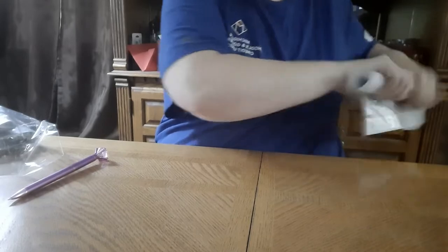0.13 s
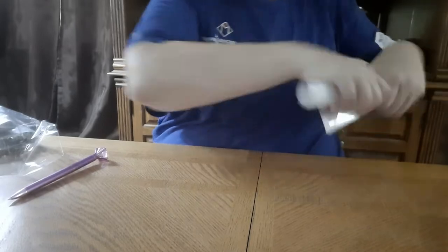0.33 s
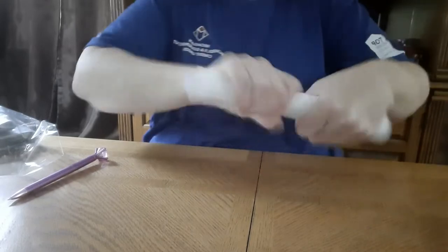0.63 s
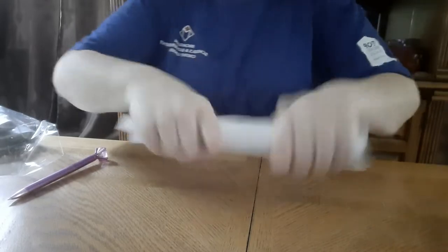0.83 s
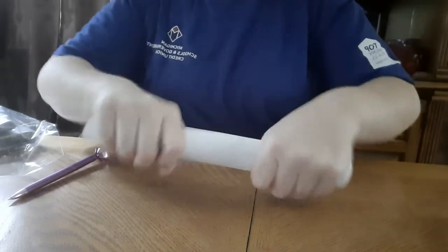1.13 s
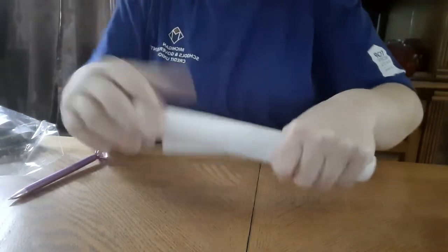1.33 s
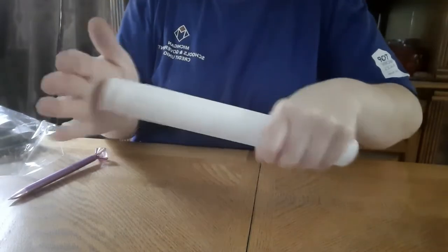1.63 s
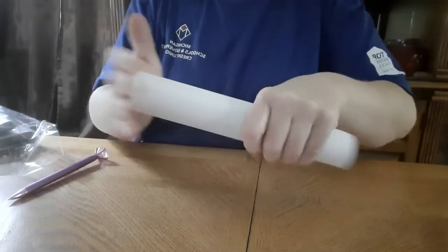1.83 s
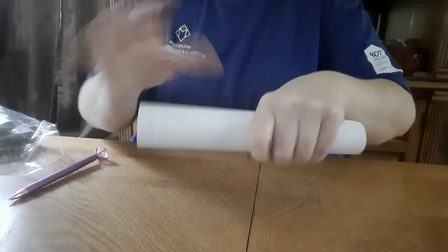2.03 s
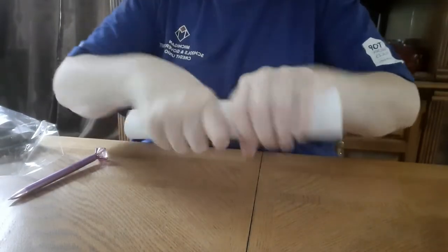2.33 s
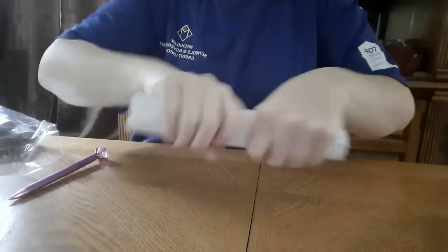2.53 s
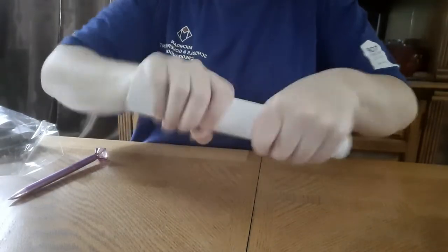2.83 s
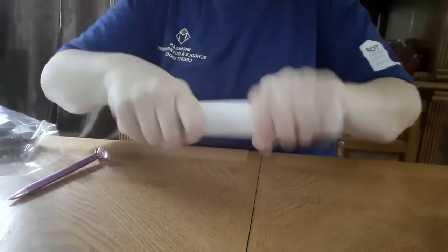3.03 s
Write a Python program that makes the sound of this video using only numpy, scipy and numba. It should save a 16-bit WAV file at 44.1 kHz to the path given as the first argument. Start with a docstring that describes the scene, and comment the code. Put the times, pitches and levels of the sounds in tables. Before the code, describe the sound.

Hands rub and tighten a stiff canvas roll over a wooden table, rasping several times a second, pausing briefly as a palm closes the end and lowers the hollow note, then rasping on; close, dry, small room.

```python
"""Two hands lift a stiff rolled canvas, which buckles, and twist it tighter over a wooden table in a small room.
Each twist slides the weave over itself: a bright noisy rasp that also sounds the air inside the roll.
Midway a palm pushes the end flush, closing the tube and lowering its note; then it opens and twisting goes on.
Small buckles, pats, finger ticks and bumps ring decaying tones or short noise bursts, over soft handling
noise and a quiet room."""
import sys
import numpy as np
from scipy import signal
from scipy.io import wavfile
from numba import njit

SR = 44100
rng = np.random.default_rng(int(sys.argv[2]) if len(sys.argv) > 2 else 0)


def digitize_waveform(pressure):
    """Quantize a signal to 16-bit integers and store it at the path in sys.argv[1].

    Rows of a 2-D input are taken as channels; values are limited to [-1, 1].
    """
    field = np.atleast_2d(pressure).T
    bounded = np.clip(field, -1, 1)
    quanta = np.round(bounded * 32767).astype(np.int16)
    wavfile.write(sys.argv[1], SR, quanta)


N = 141120  # length in samples

# Slides of the canvas over itself. Each row: peak in seconds, rise in seconds, fall in seconds, level in dB,
# air column in dB against that level, treble tilt in dB per octave, coarse scrape in dB against that level.
SLIDES = [ (.095, 0.058, 0.085, -41.5, 1, 1, -3), (.195, 0.025, 0.054, -44.5, -17, 3, 2.5),
          (.263, 0.044, 0.02, -36.5, 6.5, 4.2, -2), (.347, 0.042, 0.08, -34.5, -18, 1.4, -10.5),
          (0.496, 0.065, 0.072, -37.5, -3.5, -0.1, -7), (0.636, 0.053, 0.053, -33.5, -4.5, -0.1, -11.5),
          (.775, 0.075, 0.056, -34, -2, 0.8, -8.5), (.907, 0.062, 0.045, -32.5, -3.5, 0.5, -44),
          (1.013, 0.045, 0.064, -32.5, -1, 1.4, -5), (1.147, 0.061, 0.046, -35.5, 1, 1.5, -7.5),
          (1.295, 0.06, .04, -39, -1.5, 0.5, -19), (1.563, 0.024, .04, -37, 3.5, -1.5, -9),
          (1.67, 0.062, 0.11, -48.5, 5, -1.3, -8), (1.754, 0.051, .033, -33.5, 5.5, -1.4, -9),
          (1.804, 0.034, 0.014, -53, 15.5, 3, -16), (1.9, 0.03, 0.025, -36.5, -10.5, -0.95, -28),
          (2.001, 0.02, 0.021, -47.5, 3.5, -1.5, -22), (2.218, 0.0068, 0.034, -43, 2, 2, -21),
          (2.361, 0.079, 0.095, -33.5, 3, -0.5, -24), (2.544, 0.052, 0.057, -34, 3, 1, -22),
          (2.704, 0.065, 0.059, -33, -1, -0.15, -14.5), (2.832, 0.05, 0.06, -33.5, 4, 3, -11),
          (2.982, 0.061, .05, -31, 6.5, 0.1, -14), (3.115, 0.059, 0.037, -32.5, 3.5, 2.8, -23),
          (3.195, 0.023, .03, -48.5, 5.5, -1, -14)]


def from_db(db):
    """Turn decibels into a gain."""
    return 10 ** (np.asarray(db) / 20)


def rms_one(x):
    """Scale to an average power of one."""
    return x / np.sqrt(np.mean(x ** 2) + 1e-20)


def in_time(rows):
    """Draw straight lines between (seconds, value) rows, giving a value at every sample."""
    return np.interp(np.arange(N) / SR, *np.transpose(rows))


def at_hz(points, hz):
    """Read a (Hz, value) curve at one frequency, on a logarithmic frequency axis."""
    curve_hz, values = np.transpose(points)
    return np.interp(np.log(hz), np.log(curve_hz), values)


def cut(x, hz, kind):
    """Keep the low, high or middle part of a sound with a second-order Butterworth design."""
    sos = signal.butter(2, np.clip(hz, 10, .45 * SR), kind, fs=SR, output="sos")
    return signal.sosfilt(sos, x + 1e-18)


def pan(db):
    """Left and right gains, the left louder by db, with a mean power of one."""
    return rms_one(from_db(np.array([[db], [-db]]) / 2))


def drift(rate_hz):
    """Smooth random motion of spread 1, made by low-passing noise; a higher rate wanders faster."""
    step = 40  # samples between the slow values
    r = np.exp(-2 * step * np.pi * rate_hz / SR)
    noise = rng.standard_normal(N // step + 2002)
    slow = signal.lfilter([1], [1, -2 * r, r * r], noise)[2000:]  # skip the filter's start
    return np.interp(np.arange(N) / step, np.arange(len(slow)), rms_one(slow))


def clicks(rows):
    """Place one impulse for each (seconds, dB) row."""
    s, db = np.transpose(rows)
    places = np.clip(s * SR, 0, N - 1).astype(int)
    return np.bincount(places, from_db(db), N)


def strike(rows, modes, vary_db):
    """Each blow rings every mode as a dying sine, with a random strength of its own."""
    out = 0
    for k, (hz, db, t60) in enumerate(modes):
        r = from_db(-60 / (t60 * SR))  # loss per sample
        angle = 2 * np.pi * hz / SR
        blows = [(s, level + db + vary_db * rng.standard_normal()) for s, level in rows]
        force = clicks(blows) + 1e-18
        ring = signal.lfilter([0, np.sin(angle)], [1, -2 * r * np.cos(angle), r * r], force)
        out = out + (-1) ** k * ring  # every other mode is turned upside down
    return out


def crack(rows, decay_s):
    """Sudden releases give tiny, fading bursts of bright stereo noise."""
    fade = signal.lfilter([1], [1, -np.exp(-1 / (decay_s * SR))], clicks(rows) + 1e-18)
    return fade * cut(rng.standard_normal((2, N)), 2530, "high")


def friction():
    """Threads catch on one another at random, over smooth sliding noise; power is about one."""
    snags_per_s, spread_db, share = 1800, 2.5, 0.41  # share: part of the power that is snags
    sizes = from_db(spread_db * np.minimum(rng.exponential(1, N), 4)) * rng.choice([-1, 1], N)
    snags = rms_one(sizes * (rng.random(N) < snags_per_s / SR))
    return np.sqrt(share) * snags + np.sqrt(1 - share) * rng.standard_normal(N)


def bands(sources, spectrum):
    """Split noise into coloured stereo bands, giving (Hz, band) one at a time."""
    # Each row: frequency in Hz, left-right likeness (1 the same, -1 opposite).
    likeness = [(60, 0.45), (200, 0.63), (600, 1), (1200, -0.035), (2000, 0.44), (3300, -0.2),
                (5500, -0.14), (9000, 0.93), (12500, 0.94)]
    # Each row: frequency in Hz, left minus right in dB.
    balance = [(60, -0.5), (130, 10), (260, -0.5), (420, 4.5), (700, 0.5), (1290, 2), (2380, 5), (4400, -1),
               (6000, -0.5), (8000, -3), (10500, 6.5), (13000, 12.5), (15500, -3.5)]
    edges = np.geomspace(30, 17000, 25)
    for k, (low, high) in enumerate(zip(edges, edges[1:])):
        hz = np.sqrt(low * high)
        mid, side = cut(sources[k % 2], [low, high], "band")  # neighbours use different noise
        alike = np.clip(at_hz(likeness, hz), -1, 1)
        stereo = np.sqrt(1 + alike) * mid + np.sqrt(1 - alike) * side * [[1], [-1]]
        yield hz, from_db(at_hz(spectrum, hz)) * pan(at_hz(balance, hz)) * stereo


@njit
def resonate(x, angle, r):
    """A resonance whose pitch and damping may change at every sample."""
    out, state = np.zeros(len(x)), 0j
    for i in range(len(x)):
        state = state * r[i] * np.exp(1j * angle[i]) + x[i]
        out[i] = 2 * state.real
    return out


def stroke_powers():
    """The power of each slide over time: it swells and dies with the hand's speed."""
    drop_db = 11.5  # drop one rise or fall time away from the peak
    rise_shape, fall_shape = 2.8, 2.7  # powers that bend the two slopes
    t, rows = np.arange(N) / SR, []
    for s, rise, fall, db, *_ in SLIDES:
        away = np.minimum(np.maximum((s - t) / rise, (t - s) / fall), 4)
        shape = np.where(t < s, rise_shape, fall_shape)
        rows.append(from_db(db - drop_db * away ** shape) ** 2)
    return np.array(rows)


def rasp(powers, creep, judder):
    """The weave scratches over itself as banded friction noise, each stroke with its own brightness."""
    # Colour of the rasp. Each row: frequency in Hz, relative level in dB per Hz.
    colour = [(60, -46), (130, -14), (220, -41.5), (380, -5), (750, -5), (1000, -4), (1500, -9.5),
              (2200, -5), (3300, -3.5), (5000, -1.5), (7300, -4), (9500, -3.5), (12500, -1), (14500, 0),
              (16000, -11)]
    patchy_db, patchy_hz = 2.16, 16.7  # spread and rate of each band's own wander
    tilt_db, out = np.array(SLIDES)[:, 5], 0
    sources = np.array([[friction(), friction()], [friction(), friction()]])
    for hz, band in bands(sources, colour):
        octaves = np.log2(max(hz, 1000) / 6000)  # the tilt stays level below 1000 Hz
        strength = np.sqrt(from_db(tilt_db * octaves) ** 2 @ powers + creep ** 2)
        out = out + band * strength * from_db(patchy_db * drift(patchy_hz))
    return out * judder * from_db(1.0)


def scrape(powers):
    """Uneven slips of the edge ring the stiff sheet under each stroke."""
    # Ringing of the canvas. Each row: frequency in Hz, width in Hz, relative level in dB.
    modes = [(1067, 174, 3), (1540, 240, -4), (2070, 220, 0.5), (2655, 206, -1)]
    slips_per_s, level_db = 700, 9
    force = np.sqrt(from_db(np.array(SLIDES)[:, 6]) ** 2 @ powers)
    slips = rms_one((rng.random(N) < slips_per_s / SR) * rng.uniform(.3, 1, N))
    out = 0
    for hz, width, db in modes:
        r = np.exp(-np.pi * width / SR)
        # half of the power is shared by both ears
        signs = (rng.standard_normal(N) + rng.standard_normal((2, N))) / np.sqrt(2)
        hits = slips * force * signs + 1e-18
        rise = [(1 - r * r) / 2, 0, (r * r - 1) / 2]
        ring = signal.lfilter(rise, [1, -2 * r * np.cos(2 * np.pi * hz / SR), r * r], hits)
        out = out + from_db(level_db + db) * ring
    return out


def table_echo(x):
    """The table top mirrors the rasp; the delay swings as the hands move, shifting its colour."""
    delay_s, swing, moves_hz = 0.000597, 0.299, 3.06  # swing: spread of the delay's natural logarithm
    n, gain, echoes = np.arange(N), from_db(-7), []
    for side in x:
        delay = SR * delay_s * np.exp(swing * drift(moves_hz))
        echoes.append(np.interp(n - delay, n, side))
    return (x + gain * np.array(echoes)) / np.sqrt(1 + gain ** 2)


def air_column(powers, creep, judder):
    """Rubbing and pats sound the tube; closing one end drops each mode by half the open note."""
    # Note of the open roll. Each row: time in seconds, frequency in Hz.
    open_note = [(0, 597), (.65, 581), (1.3, 538), (1.65, 589), (2.35, 615), (2.55, 621), (2.85, 609),
                 (2.98, 587), (3.2, 604)]
    # How far the palm closes one end. Each row: time in seconds, share from 0 to 1.
    palm = [(1.5, 0.1), (1.55, 0.68), (1.58, 0.77), (1.63, 0.2), (1.66, 0.02), (1.705, .1), (1.733, 0.44),
            (1.75, 0.78), (1.772, 0.94), (1.95, 0.98), (1.985, 0.06)]
    # Air modes from the lowest up. Each row: open width in Hz, level in dB, left minus right in dB.
    modes = [(56, 14, 4), (90, -3, -1), (130, -5.5, 0), (130, -9, -17), (175, -7.5, 8)]
    # Soft pats of a hand on the roll. Each row: time in seconds, relative level in dB.
    pats = [(.004, -32.5), (.023, -37), (.422, -38), (1.0, -27), (1.564, -38.5), (1.731, -25), (1.757, -27),
            (1.811, -34), (2.258, -29), (2.988, -23.5)]
    creep_db, pat_boost_db = 1, 31
    sealed_narrowing, leak_widening = 0.43, 0.22  # a closed end loses less sound, a half-closed one more

    strength = np.sqrt(from_db(np.array(SLIDES)[:, 4]) ** 2 @ powers + (from_db(creep_db) * creep) ** 2)
    rubbing = strength * judder * friction()
    patting = from_db(pat_boost_db) * cut(clicks(pats), 900, "low")
    drive = cut(rubbing + patting, 270, "high")

    t = np.arange(N) / SR
    closed = np.clip(in_time(palm), 0, 1) * (t > palm[0][0]) * (t < palm[-1][0])
    loss = 1 - sealed_narrowing * closed + leak_widening * np.sin(np.pi * closed)
    note, out = in_time(open_note), 0
    for k, (width, db, pan_db) in enumerate(modes):
        hz = note * (k + 1 - closed / 2)
        r = np.exp(-np.pi * width * loss / SR)
        push = drive * (1 - np.exp(-np.pi * width / SR))
        out = out + from_db(db) * pan(pan_db) * resonate(push, 2 * np.pi * hz / SR, r)
    return out


def buckling():
    """The lifted sheet snaps into new folds, ringing and cracking: sharp buckles amid many small ones."""
    # Sharp buckles. Each row: time in seconds, level in dB.
    sharp = [(.004, -29.5), (.049, -32), (.129, -28), (.136, -40), (.202, -22.5), (.224, -29),
             (.254, -23.5), (.259, -43), (.266, -25), (.276, -30.5), (.352, -27), (.422, -36)]
    # Ring of the sheet. Each row: frequency in Hz, relative level in dB, time to fall by 60 dB in seconds.
    sheet = [(158, -26.5, 0.045), (354, -12, .03), (535, -6, 0.02), (787, -8.5, 0.016), (1220, -5, 0.0068),
             (1850, -6.5, 0.0079), (2670, -21, 0.0067)]
    small_end_s, small_db, small_spread_db = .4, -41.5, 4
    small = [(small_end_s * u, small_db + small_spread_db * rng.standard_normal()) for u in rng.random(40)]
    rows = list(sharp) + small
    return pan(-1.0) * (strike(rows, sheet, vary_db=5.0) + from_db(-2.5) * crack(rows, decay_s=.0011))


def finger_ticks():
    """Fingers stick and let go, each time with a tiny burst of bright noise."""
    # Each row: time in seconds, relative level in dB.
    ticks = [(.049, -26.5), (.445, -25), (.699, -32), (1.632, -45), (1.94, -44), (1.964, -31.5),
             (2.057, -44), (2.081, -44), (2.125, -41), (2.213, -41)]
    return from_db(-2.5) * crack(ticks, decay_s=0.0011)


def bumps():
    """The roll and forearms knock softly on the table top, which rings briefly."""
    # Knocks. Each row: time in seconds, level in dB.
    knocks = [(.003, -70), (.13, -49), (.262, -31), (.277, -28), (.352, -53), (.425, -49), (.48, -55),
              (1.76, -46), (2.259, -50)]
    # Ring of the table. Each row: frequency in Hz, relative level in dB, time to fall by 60 dB in seconds.
    table = [(98.4, -4, 0.073), (157, -8, 0.045), (194, -4.5, 0.017)]
    return strike(knocks, table, vary_db=1.0)


def handling():
    """Hands and arms gripping the roll make a soft, low, dull noise."""
    # Each row: time in seconds, level in dB.
    grip = [(0, -39), (.06, -63), (.2, -61), (.28, -59), (.4, -66), (.56, -67.5), (.95, -84), (1.01, -69),
            (1.3, -69), (1.42, -77.5), (1.525, -80), (1.565, -53), (1.64, -70), (1.72, -64), (1.765, -52),
            (1.83, -64.5), (2.15, -75.5), (2.3, -73.5)]
    dull = cut(cut(rng.standard_normal(N), 96, "high"), 344, "low")
    return pan(-0.85) * from_db(in_time(grip)) * rms_one(dull)


def room(x):
    """Walls return a short dull tail of fading noise, different at each ear."""
    t60_s, level_db, top_hz = 0.2, -14.5, 5000
    t = np.arange(SR // 2) / SR
    noise = cut(rng.standard_normal((2, len(t))), top_hz, "low")
    tails = noise * from_db(-60 * t / t60_s) * (t > .004)  # silent for the first 4 ms
    tails = rms_one(tails) / np.sqrt(len(t))
    return from_db(level_db) * signal.fftconvolve(x, tails, axes=1)[:, :N]


def still_room():
    """The quiet room is a steady noise, strongest in the bass."""
    # Each row: frequency in Hz, relative level in dB per Hz.
    colour = [(25, 2), (60, 1), (150, -15.5), (500, -15), (1200, -28), (4000, -31), (16000, -22)]
    noise = sum(band for _, band in bands(rng.standard_normal((2, 2, N)), colour))
    return from_db(-73.5) * rms_one(noise)


def scene():
    """Add up the roll, the hands, the table under them and the room around."""
    # Canvas that keeps creeping between strokes. Each row: time in seconds, level in dB.
    creeping = [(0, -46), (.045, -56), (.1, -47.5), (.5, -49.5), (1.15, -49), (1.23, -60), (1.33, -58),
                (1.39, -91), (1.52, -74), (1.56, -60), (1.85, -58), (1.95, -54), (2.05, -62), (2.19, -81),
                (2.23, -48.5), (3.2, -52.5)]
    powers, creep = stroke_powers(), from_db(in_time(creeping))
    judder = from_db(0.86 * drift(48))  # fast small wander of the rubbing, spread in dB
    roll = table_echo(rasp(powers, creep, judder) + scrape(powers)) + air_column(powers, creep, judder)
    dry = roll + buckling() + finger_ticks() + bumps() + handling()
    return dry + room(dry) + still_room()


def record(dry):
    """The microphone loses the deepest bass; the top is cut steeply."""
    dry = cut(dry, 62, "high")
    steep = signal.ellip(12, .1, 80, 15750, fs=SR, output="sos")  # 0.1 dB ripple, 80 dB down above 15750 Hz
    return signal.sosfilt(steep, dry)


dry = scene()
out = record(dry)
digitize_waveform(out)
```